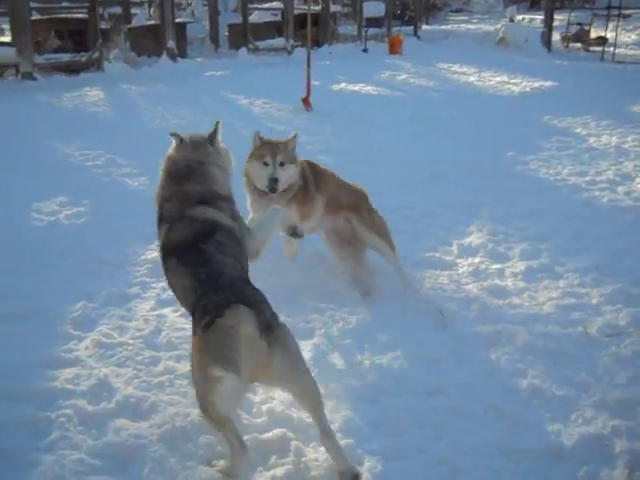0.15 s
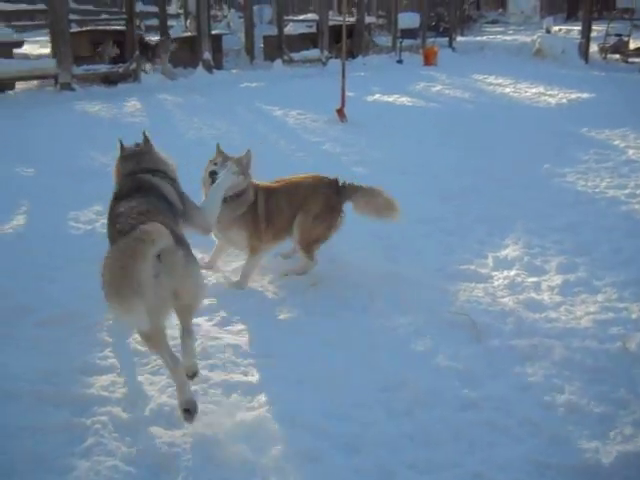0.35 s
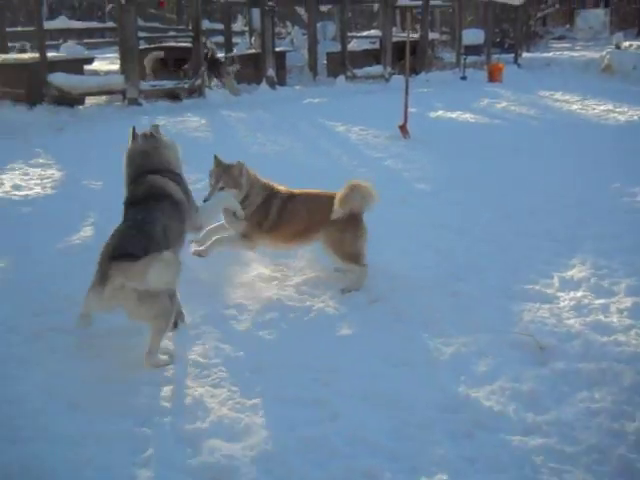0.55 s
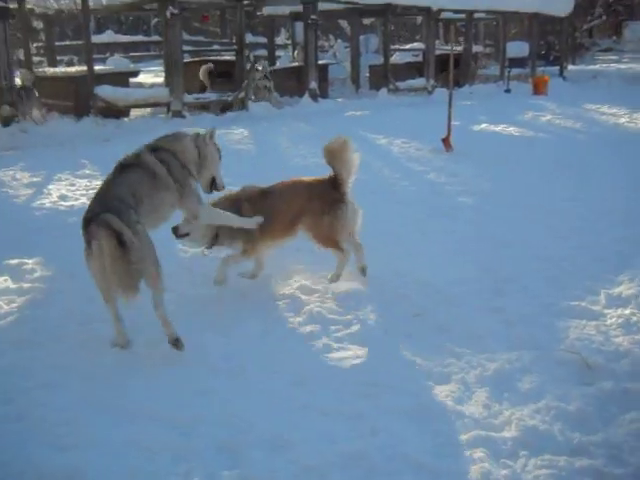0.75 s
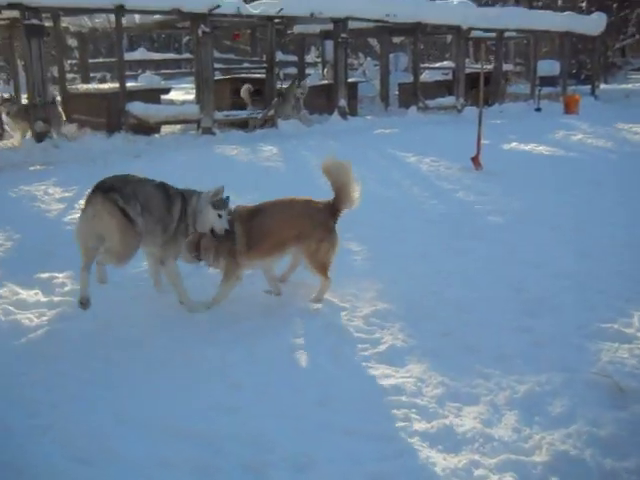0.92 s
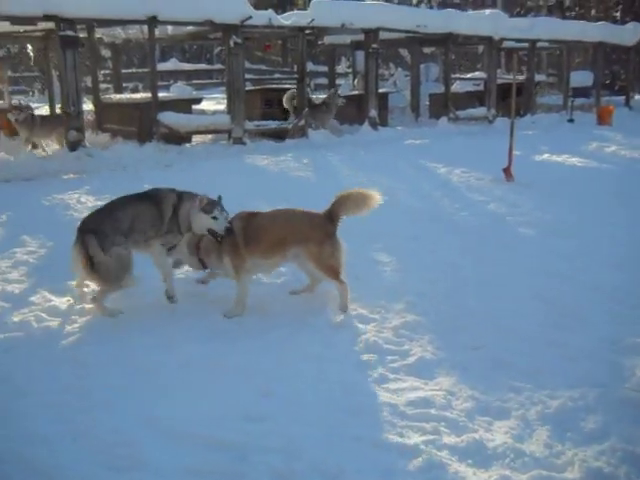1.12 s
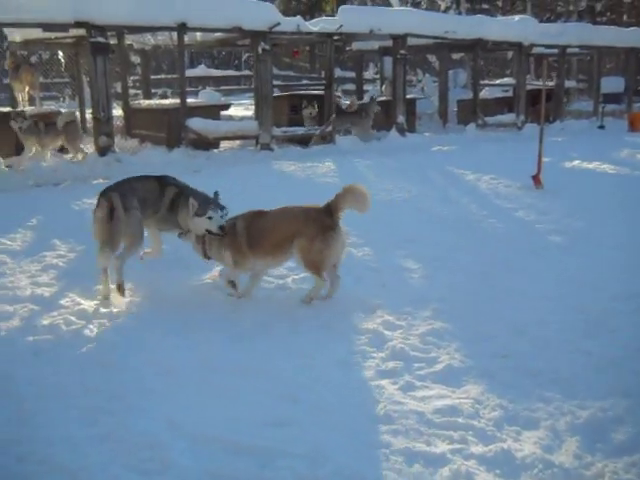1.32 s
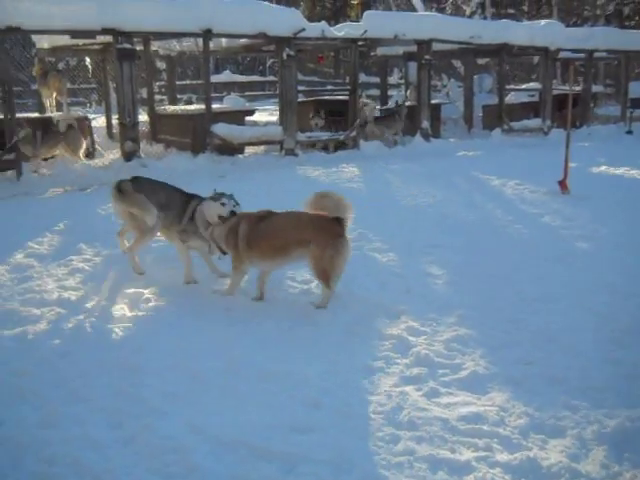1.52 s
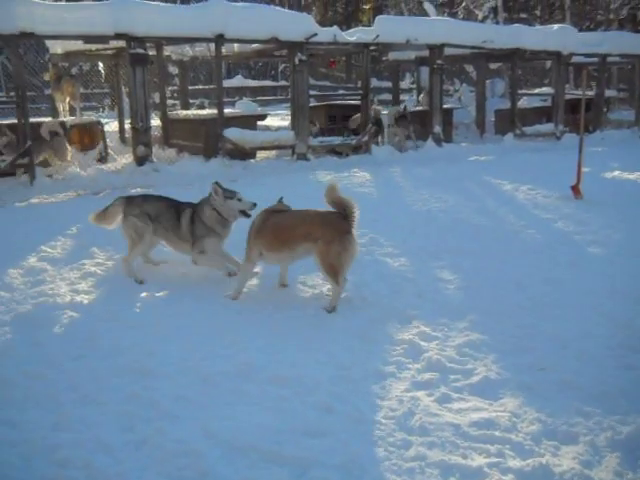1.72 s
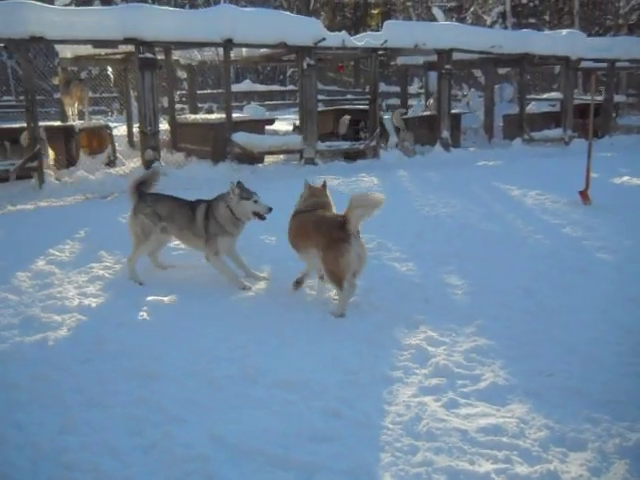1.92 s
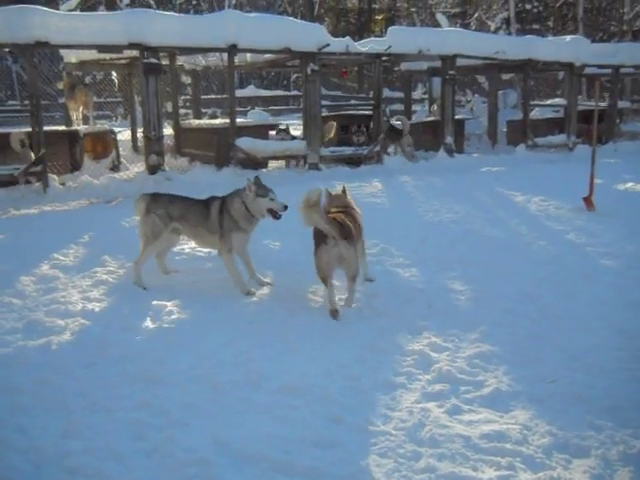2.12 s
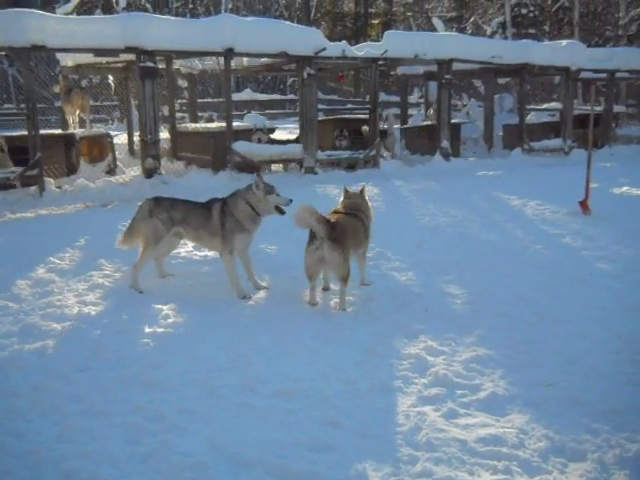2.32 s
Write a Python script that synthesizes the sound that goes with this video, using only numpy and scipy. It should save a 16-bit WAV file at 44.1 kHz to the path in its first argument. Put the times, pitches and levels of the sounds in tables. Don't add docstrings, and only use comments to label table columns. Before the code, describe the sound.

Dog play calls: sharp yelp, hoarse bark sliding into a whine, rough yap, soft whimper outdoors

```python
import sys
import numpy as np
from scipy import signal
from scipy.io import wavfile
from scipy.ndimage import uniform_filter1d

SR = 44100
rng = np.random.default_rng(int(sys.argv[2]) if len(sys.argv) > 2 else 0)


def volts(x):
    e = np.asarray(x, float) / 20
    return 10 ** e


def wav_out(sig):
    wavfile.write(sys.argv[1], SR, np.round(np.clip(np.atleast_2d(sig).T, -1, 1) * 32767).astype(np.int16))


N = 103635
T = np.arange(N) / SR

# time in seconds, pitch in Hz, level in dB of the first, second and third partial.
YELP = [(.241, 775.5, -16, -46.5, -48.5), (.247, 746, -11, -34, -35.5), (.258, 783, -9.5, -22, -24.5),
        (.268, 884.5, -5.5, -18.5, -28.5), (.28, 928.5, -7, -28, -31), (.292, 949, -8, -35.5, -25),
        (.324, 978.6, -8.5, -32.5, -27.5), (.333, 1034, -17, -32, -41.5), (.342, 1096, -19, -29.5, -70),
        (.372, 1147, -27.5, -57, -55.5), (.388, 1155, -34, -78.5, -83)]
BARK = [(.666, 642.3, -29.5, -49, -60), (0.675, 610.6, -16, -17, -22), (.688, 669, -9.5, -19.5, -28.5),
        (0.706, 703.3, -10, -27.5, -26), (0.726, 733.6, -12, -20.5, -26.5),
        (0.748, 703.6, -15, -26.5, -38.5), (0.764, 798.5, -14, -45, -55.5),
        (.774, 893, -18.5, -39.5, -38.5), (0.794, 993, -38, -31.5, -65.5)]
WHINE = [(.79, 999, -31.5, -37, -74), (0.824, 1128, -20.5, -42.5, -71.5), (0.881, 1126, -17, -35, -69.5),
         (.93, 1061, -16, -32.5, -58.5), (.962, 1148, -18, -35.5, -71), (0.992, 1108, -22, -41, -71),
         (0.997, 950, -27, -48, -75.5), (1.01, 757, -28.5, -38, -76), (1.013, 640, -48.5, -61, -76.5),
         (1.021, 398, -46, -67, -76.5), (1.033, 343, -58.5, -70, -79)]
YAP = [(1.17, 609, -55, -53, -72.5), (1.179, 605.4, -31, -30.5, -41.5), (1.198, 620.8, -20, -16, -25.5),
       (1.208, 695.2, -15, -21.5, -32.5), (1.244, 740.6, -13, -30, -46.5), (1.251, 782, -25, -23.5, -51.5),
       (1.257, 942, -18.5, -31.5, -61.5), (1.289, 1073, -26, -40.5, -64), (1.304, 1061, -27, -41.5, -66.5),
       (1.31, 1102, -41, -49.5, -65.5), (1.325, 1108, -48, -49, -66.5)]
WHIMPER = [(1.558, 512, -46, -52, -68), (1.571, 595.3, -41.5, -45, -64.5), (1.599, 733.5, -22, -57, -45.5),
           (1.613, 813, -20, -54, -50), (1.625, 1002, -27.5, -70.5, -69), (1.649, 1017, -35, -81, -77.5),
           (1.664, 960, -56, -74, -76)]
# start in seconds, length in seconds, first pitch in Hz, last pitch in Hz, level in dB.
SQUEAKS = [
    (1.925, .055, 1020, 370, -40),
    (1.385, .024, 520, 370, -47),
    (1.69, .024, 560, 400, -46),
    (1.17, .32, 210, 140, -54),
    (1.59, .045, 3600, 3640, -53),
    (1.658, .016, 3450, 3800, -53),
]
# start in seconds, end in seconds, roughness from 0 to 1, rasp level in dB, muzzle cut in Hz.
ROUGH_SPELLS = [
    (0.695, 0.771, 0.52, -12, 3000),
    (1.194, 1.261, 0.37, -14.5, 2700),
    (1.6, 1.69, 0.1, -43.5, 1800),
    (0.233, 0.345, 0.11, -30, 4234),
    (0.778, .84, 0.05, -39.5, 2880),
    (1.252, 1.371, 0.08, -45.5, 2280),
]
# time in seconds, half length in seconds, depth from 0 to 1.
BREAKS = [
    (0.2657, .003, 0.6),
    (.7145, 0.0033, 0.9),
    (0.7458, 0.002, 0.5),
    (1.209, 0.0027, 0.5),
    (1.6235, 0.0013, 0.57),
]
# start in seconds, end in seconds, depth from 0 to 1. The end lies before
THREE_BEAT = (.316, 0.3, 0.11)
# pitch in Hz, width in Hz, level in dB.
THROAT = [(688, 150, -2.5), (1226, 160, 2.5), (1487, 150, -1.5), (1800, 180, -2.5), (2596, 170, -9.5),
          (3000, 350, -21.5), (3400, 160, -14)]
# delay in seconds, level in dB.
SHED_ECHOES = [
    (0.098, -42.5),
    (0.252, -41),
]
# start in seconds, length in seconds, level in dB, grains per second.
PAWS = [(.0, .08, -42.5, 1900), (0.097, 0.063, -31, 4300), (0.168, 0.05, -39.5, 7200),
        (0.536, 0.097, -49, 1800), (0.581, 0.09, -52, 2300), (1.119, 0.044, -51.5, 990),
        (1.44, 0.038, -53, 1900), (1.576, 0.14, -45.5, 2000)]
# time in seconds, peak in dB, pitch in Hz, time to fall 60 dB in seconds.
SNAPS = [(.225, -14.5, 1400, 0.0039), (.558, -31.5, 1490, .005), (0.5807, -32.5, 380, 0.013),
         (.5875, -28.5, 560, 0.012), (.596, -31, 520, 0.019), (.6055, -31, 523, 0.021),
         (0.6268, -33.5, 526, .018), (0.647, -36.5, 1300, 0.0055), (1.581, -38.5, 3300, .004),
         (1.789, -33, 1800, .003), (1.788, -40, 171, 0.028), (1.861, -28.5, 2010, 0.0036)]
# pitch in Hz, level in dB per Hz.
SNOW_COLOUR = [(30, -11), (300, 2.5), (800, -1.5), (2500, 0.5), (3600, -3), (5000, -6)]
# pitch in Hz, level in dB per Hz.
WIND_COLOUR = [(25, 1.5), (150, -1.5), (400, -2.5), (750, -4.5), (1300, -6.5), (2200, -7.5), (3600, -8),
               (5000, -8.5)]
# time in seconds, level in dB.
WIND_LEVEL = [(0, -37), (.235, -38.5), (.275, -55.5), (.37, -60), (.65, -50.5), (.8, -55.5), (1.14, -56),
              (1.35, -57.5), (1.6, -52.5), (1.8, -48.5), (2.35, -48.5)]
# time in seconds, notch in dB, build-up in seconds, thump level in dB.
GAIN_NOTCHES = [
    (.2615, .8, .012, -24),
    (.2675, 0.1, .004, -24),
    (.294, 1.7, .08, -36),
    (.6935, 3, .009, -25),
]

ROUGH_EDGE_S, ONSET_S = 0.033, .002
PHASE_WOBBLE, WOBBLE_HZ = 1.57, 60
STRENGTH_WOBBLE, FLUTTER, FLUTTER_HZ = 0.44, 1.5, 90
UPPER_FALL_DB = -9.5
MUZZLE_HZ, MUZZLE_DB_PER_KHZ = 3300, -12.5
ROUGH_SWING = .62
FENCE_HZ, FENCE_WIDTH_HZ, FENCE_DB = 750, 120, -1.5
YARD_T60_S, YARD_DB, YARD_CUT_HZ = 4.03, -32.5, 6600
NEAR_T60_S, NEAR_DB = 0.27, -21
ECHO_FOLLOWS_GAIN = 0.91
THUMP_S, MIC_SKEW, HISS_DB = 0.011, 0.013, -102
CLIP_LEVEL, CUTOFF_HZ = .705, 3820


def rms_one(x):
    return x / np.sqrt(np.mean(x ** 2) + 1e-20)


def drift(rate_hz, count=N):
    r = np.exp(-2 * np.pi * rate_hz / SR)
    noise = rng.standard_normal(count + 4000)
    return rms_one(signal.lfilter([1], [1, -2 * r, r * r], noise)[4000:])


def window(start, end, edge):
    return np.clip(np.minimum(T - start, end - T) / edge + .5, 0, 1)


def filtered(x, order, hz, kind="low"):
    return signal.sosfilt(signal.butter(order, hz, kind, fs=SR, output="sos"), x)


def dog():
    rough = sum(np.clip(r, 0, 1) * window(start, end, ROUGH_EDGE_S) ** 2
                for start, end, r, *_ in ROUGH_SPELLS)
    voice = sum(call(rows, rough) for rows in (YELP, BARK, WHINE, YAP, WHIMPER)) + rasp()
    limited = voice / (1 + (voice / ROUGH_SWING) ** 4) ** .25
    share = np.clip(8 * (rough - .06), 0, 1)
    band = signal.butter(2, [480, 3200], "band", fs=SR, output="sos")
    change = signal.sosfiltfilt(band, limited - voice)
    return voice + share * change + squeaks()


def call(rows, rough):
    s, *columns = np.transpose(rows)
    first = int(s[0] * SR)
    span = slice(first - 400, first + 12000)
    t, rough = T[span], rough[span]
    hz, *db = (uniform_filter1d(np.interp(t, s, c), size=90) for c in columns)
    phase = 2 * np.pi * np.cumsum(hz) / SR
    phase = phase + PHASE_WOBBLE * rough * drift(WOBBLE_HZ, count=len(t))

    db += [db[2] + UPPER_FALL_DB * k for k in (1, 2, 3)]
    db = [level + MUZZLE_DB_PER_KHZ * np.maximum((k + 1) * hz - MUZZLE_HZ, 0) / 1000
          for k, level in enumerate(db)]

    held = 1 - sum(np.clip(depth, 0, 1) * np.exp(-((t - at) / half) ** 2) for at, half, depth in BREAKS)
    strength = 1 + STRENGTH_WOBBLE * rough * drift(71, count=len(t))
    tone = held * volts(db[0]) * np.sin(phase) * strength
    flutter = 1 + FLUTTER * rough * drift(FLUTTER_HZ, count=len(t)) + 0.19 * drift(96, count=len(t))
    tone += flutter * sum(volts(level) * np.sin((k + 2) * phase) for k, level in enumerate(db[1:]))

    start, end, depth = THREE_BEAT
    beat = np.sin(phase / 3) + np.sin(2 * phase / 3)
    tone *= 1 + depth * window(start, end, .008)[span] * beat
    out = np.zeros(N)
    out[span] = np.sqrt(2) * window(s[0], s[-1], ONSET_S)[span] * tone
    return out


def rasp():
    breath = rng.standard_normal(N) * volts(0.55 * drift(100))
    throat = 0
    for k, (hz, width, db) in enumerate(THROAT):
        r = np.exp(-np.pi * width / SR)
        ring = [1, -2 * r * np.cos(2 * np.pi * hz / SR), r * r]
        throat = throat + (-1) ** k * volts(db) * signal.lfilter([1 - r * r, 0, r * r - 1], ring, breath)
    throat = rms_one(filtered(throat, 3, 600, "high"))
    throat = 1.6 * np.tanh(throat / 1.6)
    out = 0
    for start, end, _, db, cut_hz in ROUGH_SPELLS:
        out = out + volts(db) * window(start, end, ROUGH_EDGE_S) ** 2 * filtered(throat, 6, cut_hz)
    return out


def squeaks():
    out = 0
    for s, length, first_hz, last_hz, db in SQUEAKS:
        u = np.clip((T - s) / length, 0, 1)
        phase = 2 * np.pi * np.cumsum(first_hz + (last_hz - first_hz) * u) / SR
        out = out + volts(db) * np.sin(np.pi * u) * np.sin(phase)
    return out


def yard(x):
    r = np.exp(-np.pi * FENCE_WIDTH_HZ / SR)
    ring = [1, -2 * r * np.cos(2 * np.pi * FENCE_HZ / SR), r * r]
    x = x + volts(FENCE_DB) * signal.lfilter([1 - r, 0, r - 1], ring, x)

    trees = volts(-60 * T / YARD_T60_S) * np.clip(T / 0.019, 0, 1)
    fences = volts(-60 * T / NEAR_T60_S) * np.clip(T / 0.032, 0, 1)
    shapes = [(trees, YARD_DB), (fences, NEAR_DB)]
    shapes += [(np.exp(-((T - s) / 0.024) ** 2), db) for s, db in SHED_ECHOES]
    tail = 0
    for shape, db in shapes:
        smear = shape * rng.standard_normal(N)
        tail = tail + volts(db) * smear / np.sqrt(np.sum(smear ** 2))
    return filtered(signal.fftconvolve(x, tail)[:N], 1, [700, YARD_CUT_HZ], "band")


def paws():
    rate = sum(n * ((T >= s) & (T < s + length)) for s, length, _, n in PAWS) + 500
    grains = (rng.random((2, N)) < rate / SR) * volts(2.53 * rng.exponential(1, (2, N)))
    grains = grains * rng.choice([-1, 1], (2, N))
    press = sum(volts(db) * np.sin(np.pi * np.clip((T - s) / length, 0, 1)) ** 2
                for s, length, db, _ in PAWS)
    return coloured(grains / np.sqrt(rate), SNOW_COLOUR, patchy_db=1.0) * press


def snaps():
    out = 0
    for s, db, hz, t60 in SNAPS:
        u = np.maximum(T - s, 0)
        out = out + volts(db - 60 * u / t60) * np.sin(2 * np.pi * hz * u)
    return out


def wind(level_db):
    return volts(level_db) * coloured(rng.standard_normal((2, N)), WIND_COLOUR, patchy_db=1.5)


def coloured(x, spectrum, patchy_db):
    edges = 22 * 2 ** np.arange(0, 8.5, .5)
    swell, flicker = drift(5.4), [drift(16) for _ in range(4)]
    spectrum_hz, spectrum_db = np.transpose(spectrum)
    out = 0
    for k, (low, high) in enumerate(zip(edges, edges[1:])):
        band = filtered(x[k % 2], 2, [low, high], "band")
        db = np.interp(np.log(np.sqrt(low * high)), np.log(spectrum_hz), spectrum_db)
        patches = swell + np.roll(flicker[k % 4], 9000 * k)
        out = out + band * volts(db + patchy_db * patches)
    return rms_one(out)


def scene():
    voice = dog()
    wind_db = np.interp(T, *np.transpose(WIND_LEVEL))
    gain = volts(ECHO_FOLLOWS_GAIN * (wind_db - wind_db.mean()))
    echoes = gain * yard(voice / gain)
    return (voice + echoes + paws() + snaps() + wind(wind_db))[None]


def roll_off(x):
    return signal.sosfilt(signal.butter(12, 15700, fs=SR, output="sos"), x)


def record(dry):
    notch_db = sum(db * np.clip(1 - (s - T) / rise, 0, 1) * (T < s) for s, db, rise, _ in GAIN_NOTCHES)
    x = dry * volts(notch_db)
    for k, (s, _, _, thump_db) in enumerate(GAIN_NOTCHES):
        u = np.maximum(T - s, 0) / THUMP_S
        x = x + (-1) ** k * volts(thump_db) * (T >= s) * np.exp(-u) * (1 - .5 * u)
    x = filtered(x + MIC_SKEW * x ** 2, 1, 28, "high")
    x = signal.sosfilt(signal.cheby1(8, .5, CUTOFF_HZ, fs=SR, output="sos"), x)
    x = np.clip(x, -CLIP_LEVEL, CLIP_LEVEL) + volts(HISS_DB) * rng.standard_normal(x.shape)
    return roll_off(x)


dry = scene()
out = record(dry)
wav_out(out)
```